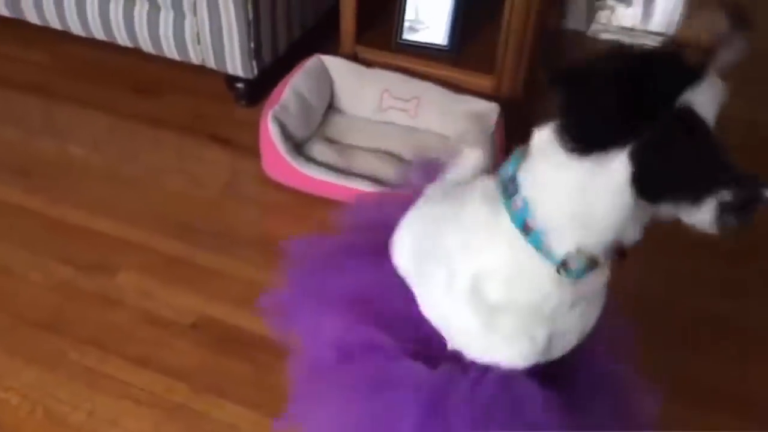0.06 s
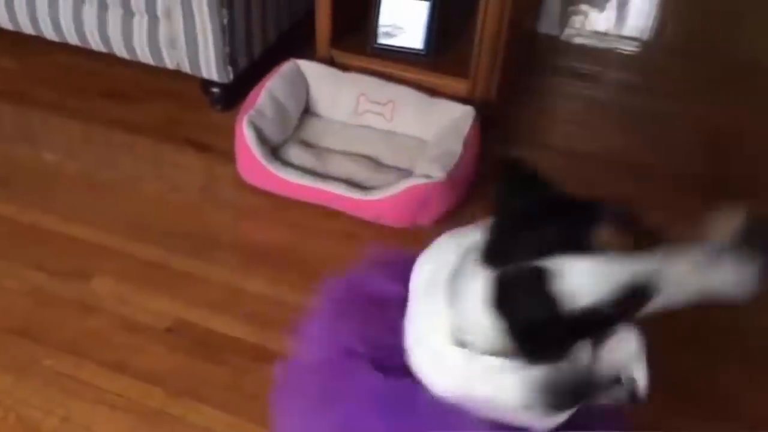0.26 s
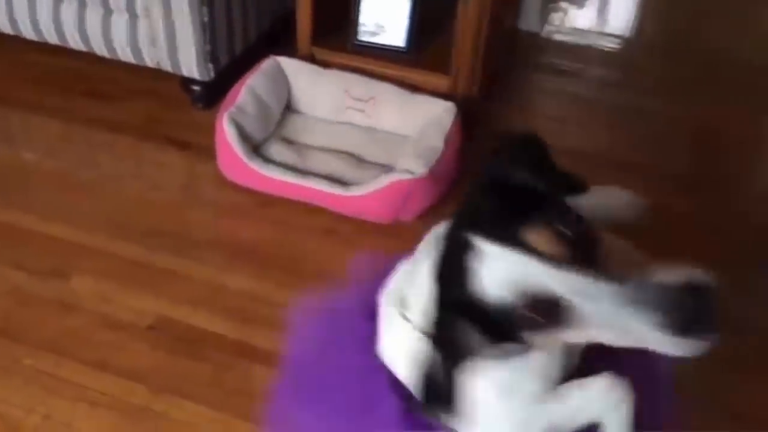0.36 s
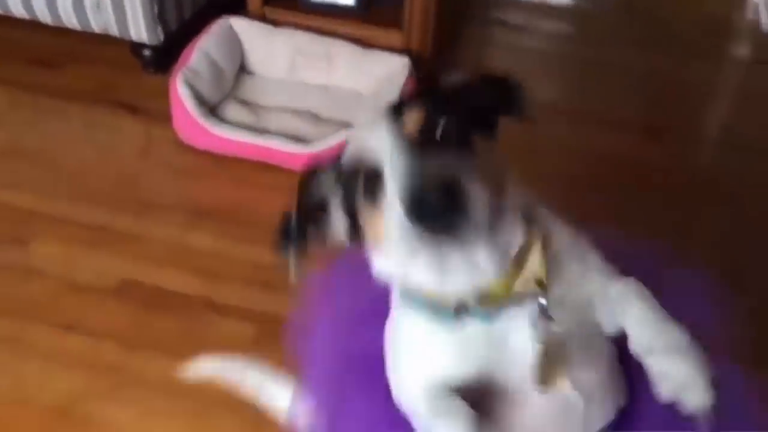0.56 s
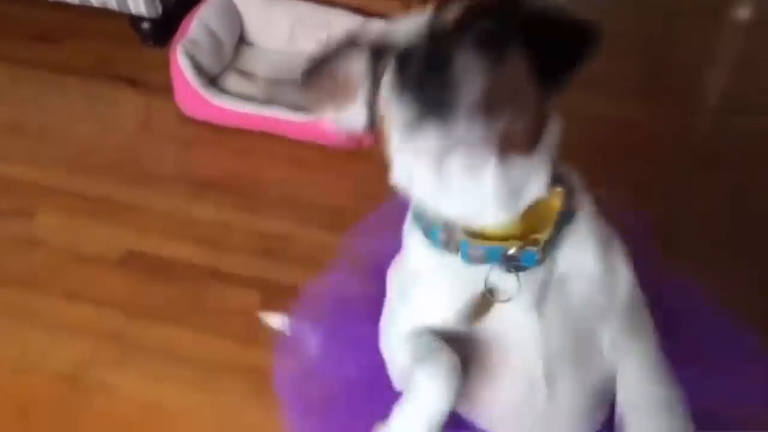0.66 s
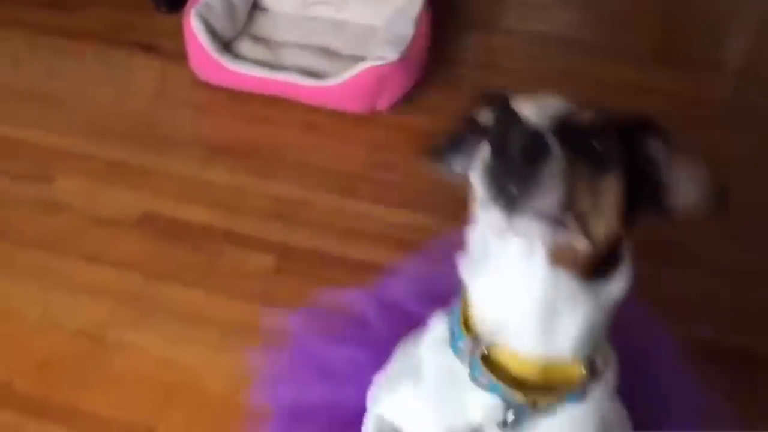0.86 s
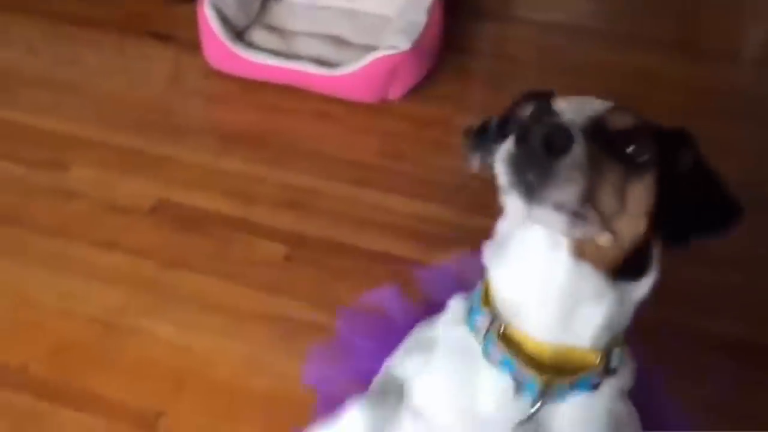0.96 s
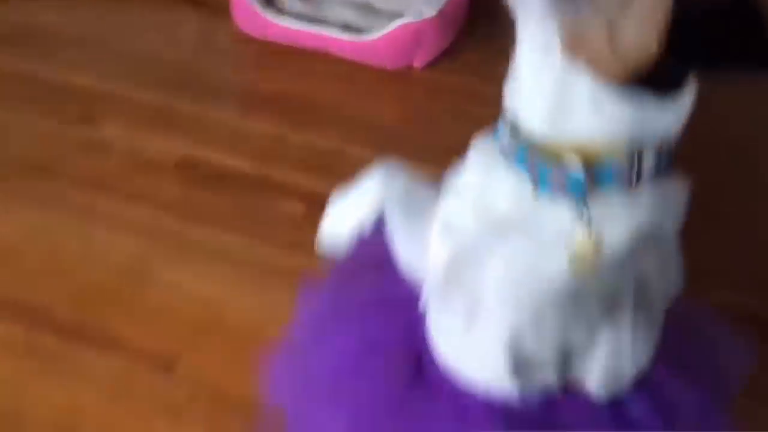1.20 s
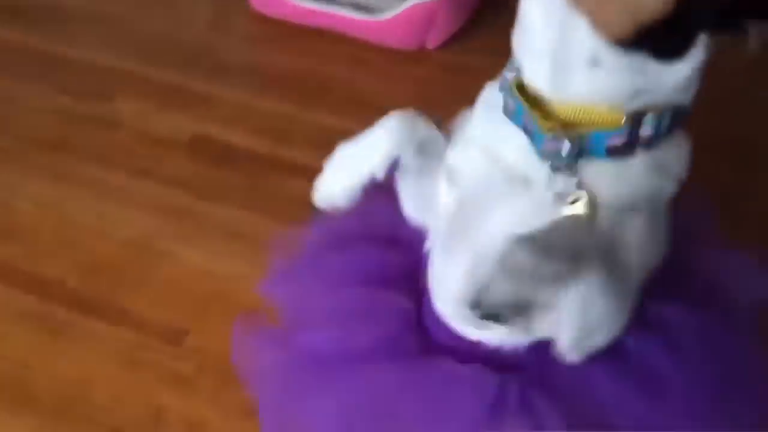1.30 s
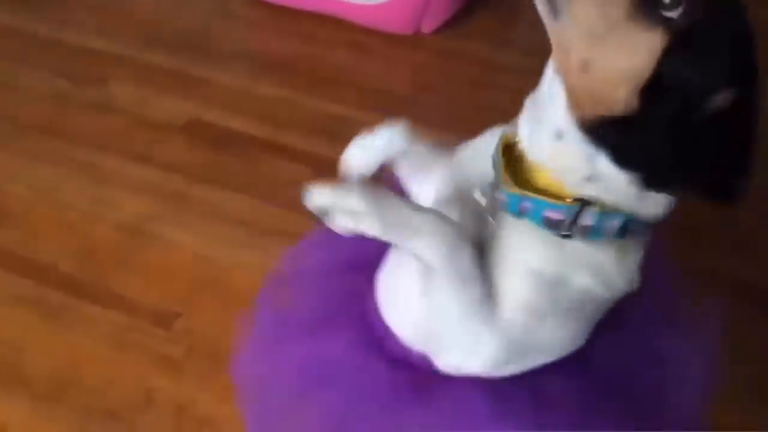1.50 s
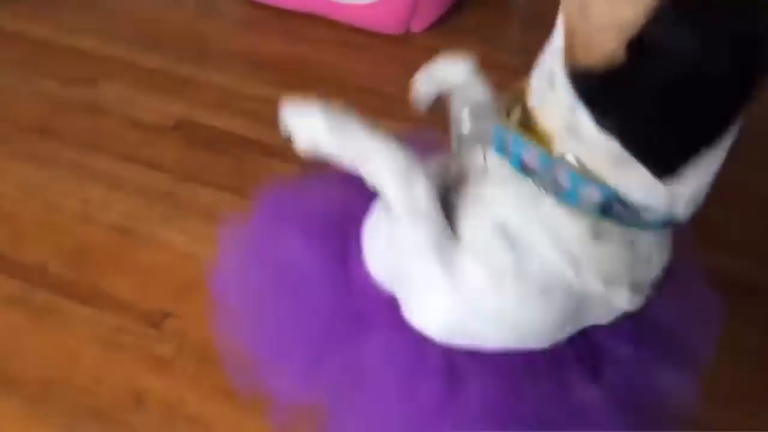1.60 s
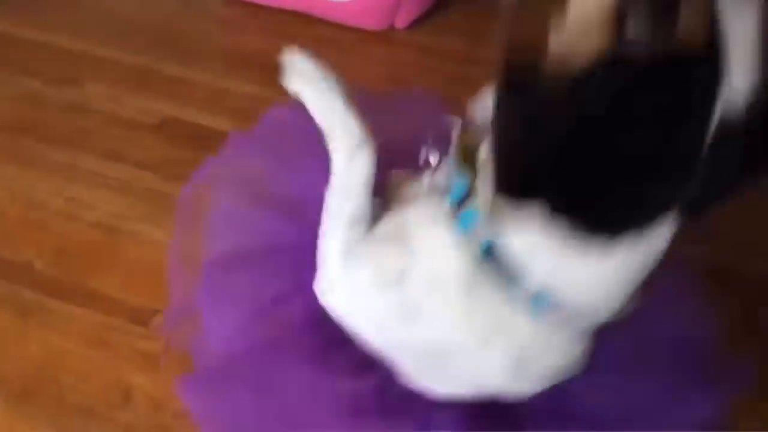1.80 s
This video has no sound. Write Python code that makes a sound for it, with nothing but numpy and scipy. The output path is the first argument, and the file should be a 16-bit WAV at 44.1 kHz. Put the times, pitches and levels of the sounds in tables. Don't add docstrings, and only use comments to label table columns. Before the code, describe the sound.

A small dog's claws click and knock irregularly on a hardwood floor in a living room.

```python
import sys
import numpy as np
from scipy import signal
from scipy.fft import rfft, irfft, next_fast_len
from scipy.io import wavfile

SR = 44100
rng = np.random.default_rng(int(sys.argv[2]) if len(sys.argv) > 2 else 0)


def generate_wav(sig):
    pcm = np.round(np.clip(np.atleast_2d(sig).T, -1, 1) * 32767).astype(np.int16)
    wavfile.write(sys.argv[1], SR, pcm)


def makeup_ratio(level_db):
    decades = np.asarray(level_db, float) / 20
    return 10 ** decades


N = 81585

# start_s, click_db, click_pitch_hz, knock_db, room_db
LANDINGS = [(-.06, -21, 5940, -43, 1), (0.2036, -16, 6670, -37.5, 3.5), (0.3, -16, 6600, -32, 4),
            (0.523, -14, 6890, -34.5, -1), (.6421, -18.5, 7870, -35.5, 1.5), (0.7021, -33, 5380, -37.5, 6),
            (0.85, -20.5, 6960, -43.5, 0.5), (0.9176, -20, 6760, -39, 2.5),
            (1.3291, -33.5, 6500, -55.5, -1.5), (1.4395, -16.5, 6500, -39, 1.5),
            (1.4649, -22.5, 6500, -40, 3), (1.7283, -45.5, 8100, -70, 10), (1.7865, -49, 2960, -56.5, 5.5),
            (0.6337, -39.5, 3100, -40.5, 6), (.672, -34.5, 2960, -35.5, 4.5),
            (0.8061, -40.5, 6800, -66, 6.5), (0.1937, -50, 5900, -59, 4)]
# delay_ms, level_db
CLICK_BURST = [(0, 0), (.42, -1), (.9, -6), (1.25, -3), (1.6, -6)]
# start_s, level_db, pitch_hz
CLAW_TIPS = [(.2075, -17, 7500), (.2095, -17, 7500), (.3033, -23, 5000), (.5254, -18, 5500),
             (.5293, -19, 8000), (.6567, -28, 10000), (.6602, -27, 6000), (.9252, -24, 9000),
             (.9352, -26, 8000), (1.0395, -40, 5000), (1.3455, -44, 7000), (1.4275, -44, 7500),
             (1.4348, -25, 8500), (1.4365, -31, 8500), (1.4477, -18, 8000), (1.7342, -39, 8500),
             (.779, -44, 8000), (.761, -38, 3500), (.968, -36, 6500), (.1835, -50, 1500)]
# pitch_hz, level_db, t60_s
BOARD_MODES = [(585.5, -8.5, 0.0086), (870, -5.5, 0.015), (1085, -0.5, 0.011), (1390, -1.5, 0.015),
               (1950, 0, 0.0095), (2480, -0.5, .016)]
# start_s, level_db, pitch_hz
PLANK_NOTES = [(-.04, -36, 2080), (.204, -29.5, 2480), (.21, -39, 860), (.3, -39.5, 600),
               (.301, -38.5, 870), (.302, -32, 1506), (.5225, -34, 2460), (.528, -34.5, 1350),
               (.54, -36.5, 880), (.7015, -35.5, 907), (.71, -44, 488), (.8503, -41, 1320),
               (1.4395, -34, 1890), (1.787, -51, 1710)]
# start_s, level_db, pitch_hz, t60_s
PAD_THUMPS = [(0.211, -36.5, 212, 0.065), (0.221, -30.5, 356, 0.028), (0.314, -42, 330, 0.035),
              (.525, -49.5, 478, 0.15), (0.559, -45.5, 290, 0.069), (.7, -50, 311, 0.15),
              (0.888, -50.5, 171, 0.24), (0.954, -34.5, 167.5, 0.065), (1.445, -38, 266, 0.073),
              (1.469, -41, 329, 0.077), (1.786, -38, 385, 0.033), (0.156, -49.5, 162.6, 0.17),
              (1.384, -54, 110, 0.03), (1.651, -44, 129, 0.089), (0.658, -39.5, 178, 0.075)]
# start_s, part (name), level_db
CHINKS = [(.428, "short", -47), (.598, "short", -54), (.6, "clip", -58), (.697, "long", -60),
          (.799, "short", -62), (.824, "short", -62), (.89, "link", -49), (.906, "short", -60),
          (1.03, "ring", -42), (1.03, "link", -48), (1.031, "short", -58), (1.034, "long", -55),
          (1.119, "ring", -50), (1.12, "long", -52), (1.12, "clip", -56), (1.383, "held", -45),
          (1.214, "ring", -62), (1.22, "short", -55), (1.222, "ring", -57), (1.226, "clip", -58),
          (1.383, "long", -61), (1.397, "hook", -68), (1.398, "clip", -62), (1.543, "short", -52),
          (1.545, "long", -58), (1.546, "hook", -58), (1.553, "ring", -42), (1.556, "short", -46),
          (1.786, "short", -66), (.428, "rim", -60)]
COLLAR_PARTS = {"long": [(11625, -1, .29)], "short": [(12560, 0, .07), (12535, -7, .2), (14600, -22, .06)],
                "ring": [(6870, 0, .04), (12600, -4, .03), (10000, -8, .03), (6840, -24, .25)],
                "link": [(10060, 0, .07)], "clip": [(11270, 0, .04)], "hook": [(10460, 0, .12)],
                "rim": [(9875, 0, .3)], "held": [(11600, 0, .04)]}
# frequency_hz, t60_s
ROOM_DECAY = [(200, 0.48), (1000, 0.41), (3000, 0.5), (7000, 0.38), (11000, 0.38), (15000, 0.28)]
# frequency_hz, level_db
ROOM_COLOUR = [(150, 5), (1000, 2), (3000, 0.5), (7000, -1), (11000, -5), (15500, 2.5)]
# frequency_hz, level_db (per Hz)
AIR_SPECTRUM = [(13, -52), (22, -15), (132, -6.5), (263, -15), (347, -19), (1170, -35.5), (10900, -43.5),
                (11800, -48), (16000, -117)]
# pitch_hz, level_db (rms)
HUM_TONES = [(120, -72), (727, -79)]
# frequency_hz, level_db
MICROPHONE = [(20, 2), (15000, 1.5), (15500, -38), (16400, -26), (16700, -90)]


def along(points, hz):
    f, v = np.transpose(points)
    return np.interp(np.log(hz + 1), np.log(f + 1), v)


def coloured(x, points):
    size = next_fast_len(N + 8192)
    gain = makeup_ratio(along(points, np.fft.rfftfreq(size, 1 / SR)))
    return irfft(rfft(x, size) * gain, size)[:N]


def add(track, start_s, x):
    i = round(start_s * SR)
    first = max(i, 0)
    x = x[max(-i, 0):][:max(N - first, 0)]
    track[first:][:len(x)] += x


def click(at_s, pitch_hz, t):
    cycles = (t - at_s) * pitch_hz - 1
    return np.sin(2 * np.pi * cycles) * np.exp(-(cycles / 0.44) ** 2)


def grit_of(tip, t):
    return np.convolve(rng.standard_normal(len(t)), tip[:64])[:len(t)]


def ring(modes, t, scatter_db):
    out = np.zeros(len(t))
    for pitch_hz, level_db, t60_s in modes:
        decay = makeup_ratio(level_db + scatter_db * rng.normal() - 60 * t / t60_s)
        out += decay * np.sin(2 * np.pi * pitch_hz * t)
    return out


def soft_start(t, rise_s):
    return 1 - np.exp(-t / rise_s)


def room(x, level_db):
    build_s = 0.0022
    hz, t, z = signal.stft(rng.standard_normal(SR * 3 // 4), SR, nperseg=256)
    decay_db = 60 * t / along(ROOM_DECAY, hz)[:, None]
    shape = makeup_ratio(along(ROOM_COLOUR, hz)[:, None] - decay_db)
    tail = signal.istft(z * shape, SR, nperseg=256)[1]
    tail = tail * soft_start(np.arange(len(tail)) / SR, build_s)
    return makeup_ratio(level_db) * signal.fftconvolve(x, tail / np.linalg.norm(tail))


def paw_clicks(level_db, pitch_hz, t):
    tips = np.zeros(len(t))
    for delay_ms, loss_db in CLICK_BURST:
        force, timing, pitch = rng.normal(size=3)
        uneven_db = 1.5 * force * (delay_ms > 0)
        delay_s = delay_ms * (1 + 0.1 * timing) / 1000
        tips += makeup_ratio(level_db + loss_db + uneven_db) * click(delay_s, pitch_hz * (1 + 0.08 * pitch), t)
    return tips


def board_knock(t):
    modes = [(hz * (1 + 0.06 * rng.normal()), db, t60_s) for hz, db, t60_s in BOARD_MODES]
    return ring(modes, t, 2) * soft_start(t, 0.0005)


def claws():
    rattle_db, rattle_s = -15, 0.014
    swell_db, swell_s = -27, 0.0013
    wall_s, wall_db = 0.016, -11
    tail_db = -1
    out = np.zeros(N)
    t = np.arange(SR // 16) / SR
    for start_s, click_db, pitch_hz, knock_db, room_db in LANDINGS:
        first = makeup_ratio(click_db) * click(0, pitch_hz, t)
        grit = grit_of(first, t)
        tips = paw_clicks(click_db, pitch_hz, t) + makeup_ratio(rattle_db - 60 * t / rattle_s) * grit
        knock = makeup_ratio(knock_db) * board_knock(t)
        swell = makeup_ratio(swell_db) * np.exp(-t[::-1] / swell_s) * grit
        add(out, start_s - len(t) / SR, swell)
        add(out, start_s, tips + knock)
        add(out, start_s + wall_s, makeup_ratio(wall_db + min(room_db, 0)) * tips)
        add(out, start_s, room(2 * first + knock, tail_db + room_db))
    for start_s, level_db, pitch_hz in CLAW_TIPS:
        tip = makeup_ratio(level_db) * click(0, pitch_hz, t)
        rattle = makeup_ratio(rattle_db - 2 - 90 * t / rattle_s) * grit_of(tip, t)
        add(out, start_s, tip + rattle)
        add(out, start_s, room(tip, tail_db))
    return out


def planks():
    out = np.zeros(N)
    t = np.arange(SR // 16) / SR
    for start_s, level_db, pitch_hz in PLANK_NOTES:
        note = ring([(pitch_hz, level_db, 0.013)], t, 0)
        add(out, start_s, note)
        add(out, start_s, room(note, 1))
    return out


def pads():
    out = np.zeros(N)
    t = np.arange(SR // 4) / SR
    for start_s, level_db, pitch_hz, t60_s in PAD_THUMPS:
        modes = [(pitch_hz, 0, t60_s), (1.6 * pitch_hz, -6, 0.7 * t60_s)]
        push = makeup_ratio(level_db) * ring(modes, t, 1) * soft_start(t, 0.005)
        add(out, start_s, push)
        add(out, start_s, room(push, -6))
    return out


def tags():
    tick_db, tick_s = -8, 0.017
    out = np.zeros(N)
    t = np.arange(SR // 2) / SR
    for start_s, part, level_db in CHINKS:
        chink = makeup_ratio(level_db) * ring(COLLAR_PARTS[part], t, 1) * soft_start(t, 0.00033)
        bright_noise = np.diff(rng.standard_normal(len(t) + 1))
        tick = makeup_ratio(level_db + tick_db - 60 * t / tick_s) * bright_noise
        add(out, start_s, chink + tick)
    return out + room(out, -19)[:N]


def air():
    t = np.arange(N) / SR
    rumble = coloured(rng.standard_normal(N), AIR_SPECTRUM)
    drift = np.cumsum(rng.standard_normal(N)) * 0.004
    hum = np.zeros(N)
    for pitch_hz, level_db in HUM_TONES:
        hum += makeup_ratio(level_db) * np.sqrt(2) * np.sin(2 * np.pi * pitch_hz * t + drift)
    hiss = makeup_ratio(-78.5) * np.diff(rng.standard_normal(N + 1))
    return makeup_ratio(-60) * rumble / rumble.std() + hum + hiss


def scene():
    return (claws() + planks() + pads() + tags() + air())[None]


def roll_off(x):
    return signal.sosfilt(signal.butter(12, 16500, fs=SR, output="sos"), x)


def record(dry):
    mix = coloured(dry[0], MICROPHONE)[None]
    return roll_off(mix)


dry = scene()
out = record(dry)
generate_wav(out)
```